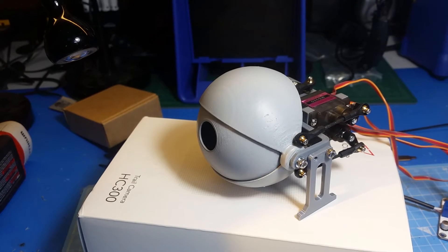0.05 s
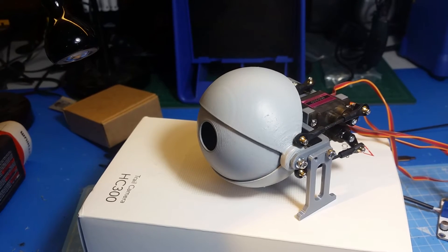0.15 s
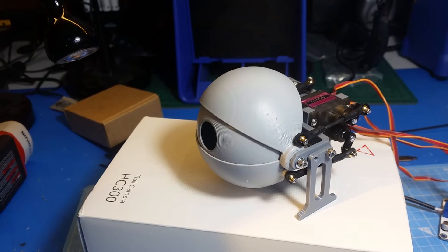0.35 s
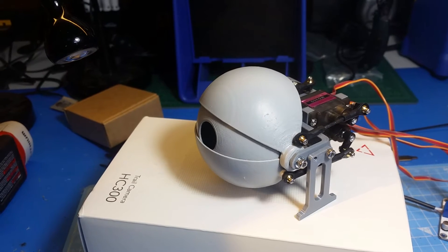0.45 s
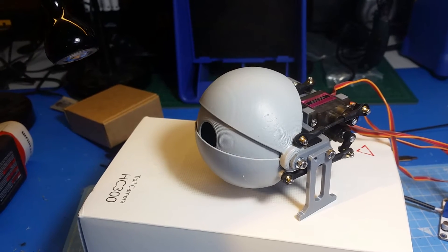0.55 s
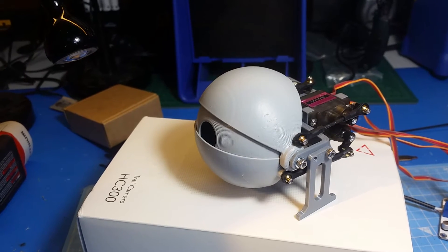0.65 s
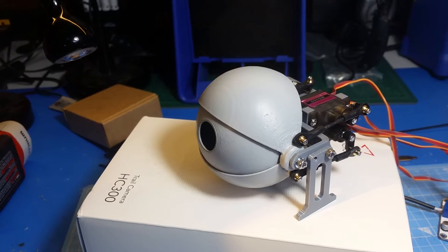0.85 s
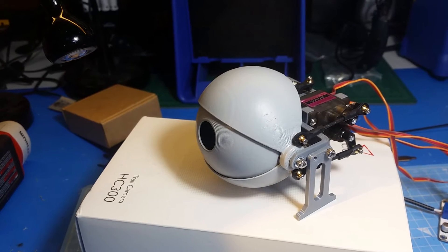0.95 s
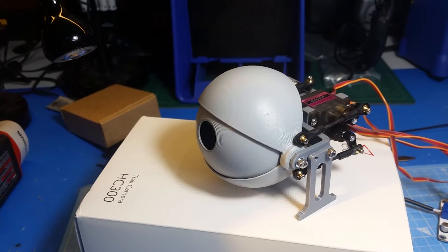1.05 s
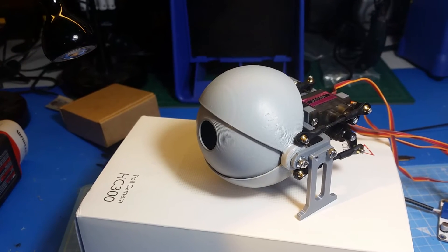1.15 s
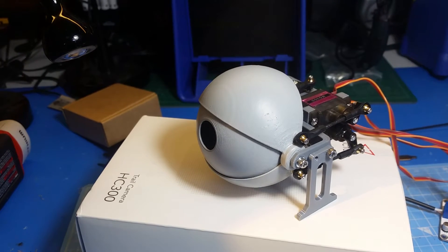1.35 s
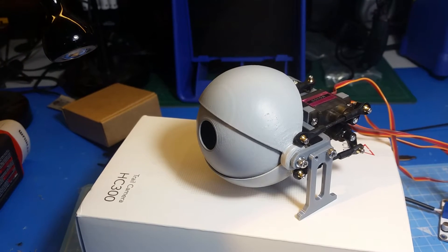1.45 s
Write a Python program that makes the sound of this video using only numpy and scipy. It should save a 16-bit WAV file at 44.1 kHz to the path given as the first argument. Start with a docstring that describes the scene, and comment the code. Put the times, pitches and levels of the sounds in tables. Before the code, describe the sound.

After a moment of faint hum and hiss, tiny plastic-geared motors buzz and chatter twice, pause, then twice more; soft knocks and taps follow, close to the microphone with light room echo.

```python
"""A low hum and faint hiss in a quiet workshop, then two pairs of short servo whirs, heard close.
The servos move a plastic mechanical eye on a cardboard box. Tooth contacts are clicks and chatter that
excite the servo cases; grinding and gliding whines sound through the plastic frame.
Levers knock softly, the box booms faintly and the lid settles with taps; bench and room add echoes."""
import sys
import numpy as np
from scipy import signal
from scipy.fft import rfft, irfft, next_fast_len
from scipy.io import wavfile
from scipy.ndimage import map_coordinates

SR = 44100
rng = np.random.default_rng(int(sys.argv[2]) if len(sys.argv) > 2 else 0)


def wav_out(sig):
    """Save sig, one row per channel (or a flat mono array), as 16-bit PCM at SR to the path in sys.argv[1]."""
    wavfile.write(sys.argv[1], SR, np.round(np.clip(np.atleast_2d(sig).T, -1, 1) * 32767).astype(np.int16))


N = 66150

# room noise spectrum shapes: (frequency [Hz], relative density [dB])
RUMBLE_SHAPE = [(12, -40), (20, -12), (42, -9), (65, -11), (101, -5), (145, -8), (167, -18), (204, -15),
                (282, -19), (318, -13), (507, -30), (2500, -45), (3250, -76), (5500, -120)]
HISS_SHAPE = [(1200, -12.5), (2500, -17), (3500, -12.5), (4500, 0), (5200, -11.5), (6300, -25.5),
              (9000, -31), (13000, -27.5), (16000, -23.5)]
# left-right correlation of the room noise: (frequency [Hz], correlation [0-1])
NOISE_CORRELATION = [(40, 1), (300, 0.31), (800, 0), (2000, 0), (10000, 0.091)]
# room hum: (frequency [Hz], mean level [dB])
HUM_TONES = [(97, -72), (199, -81), (317, -73)]
RUMBLE_DB, HISS_DB = -63.5, -73

# room decay: (frequency [Hz], t60 [s])
ROOM_T60 = [(150, 0.93), (1000, 0.8), (6000, 0.55), (15000, 0.72)]
# room response: (frequency [Hz], relative gain [dB])
ROOM_RESPONSE = [(1500, 8.5), (3700, 10), (6000, -7), (9000, -16.5), (13000, -7)]
WHIR_TO_ROOM_DB, BODY_TO_ROOM_DB, BENCH_DB, BENCH_T60_S = -11, -21, -8, 0.033

# box rocking under the moving eye: (start [s], length [s], level [dB])
BOX_ROCKING = [(0.305, 0.12, -56), (0.441, 0.12, -52.5), (0.618, 0.062, -55), (0.806, 0.092, -53),
               (0.9, 0.14, -56.5)]
BOX_HZ, BOX_SECOND_HZ, BOX_SECOND_DB = 89.37, 133, -10
BOX_WAVER_SHARE, BOX_UNEVEN_DB = 0.082, 2

# linkage knocks: (time [s], peak [dB], centre [Hz], time to fall 20 dB [s])
LINKAGE_KNOCKS = [(0.115, -49, 134, 0.0028), (0.933, -53, 1010, 0.054), (0.944, -48, 248, 0.12),
                  (1.027, -58, 765, 0.032)]
# lid taps against the frame: (time [s], peak [dB])
LID_TAPS = [(1.025, -58.5), (1.034, -51), (1.046, -59.5)]
TAP_FALL_20DB_S, TAP_NOISE_GAIN = 0.014, 0.053

# grinding in the frame: (time [s], level [dB])
GRIND_LEVEL = [(.17, -80), (.225, -58), (.262, -49.5), (.305, -63.5), (.36, -61), (.42, -59), (.47, -61.5),
               (.505, -60), (.59, -75.5), (.69, -76.5), (.745, -53), (.777, -49), (.83, -63), (.862, -51.5),
               (.91, -59), (.947, -56.5), (1.0, -78.5)]
# plastic frame and box response: (frequency [Hz], relative gain [dB])
FRAME_RESPONSE = [(60, -5), (200, -4), (330, -6), (500, -4), (620, -14), (800, -17), (1000, -9.5),
                  (1250, -16), (1650, -7), (1850, -14), (2020, -15), (2400, -23), (4000, -38)]
# frame resonances: (centre [Hz], width [Hz], relative gain [dB])
FRAME_RESONANCES = [(319, 10, 0), (478, 72, -0.5), (711.4, 22, -3), (986, 80, -15.5), (1577, 23, -24.5)]
# frame sound, left over right: (frequency [Hz], difference [dB])
FRAME_LEFT_OVER_RIGHT = [(300, 0), (550, -1), (800, 3), (1200, 7), (1700, 11), (2700, 7)]
# gear whines:
# (start [s], length [s], first pitch [Hz], last pitch [Hz], level before trim [dB], pitch jitter [share])
GEAR_WHINES = [(0.239, 0.039, 465, 531.5, -39.5, 0.0047), (0.222, 0.082, 1106, 1767, -54.5, 0.036),
               (0.232, 0.067, 698, 713, -59.5, .004), (0.272, 0.025, 394, 181, -47.5, 0.053),
               (0.348, 0.029, 1524, 1515, -52, 0.036), (0.354, 0.063, 1140, 1118, -62.5, 0.015),
               (0.487, 0.045, 1610, 1700, -54, .06), (0.735, 0.037, 318, 380.6, -49.5, 0.018),
               (0.739, 0.057, 1685, 1629, -51, .015), (.762, 0.027, 440.6, 546, -49.5, 0.031),
               (.766, .035, 1960, 1980, -54.5, 0.0095), (.768, 0.027, 954, 983.3, -54.5, .03),
               (.925, 0.052, 2013, 1992, -60, 0.018)]
FRAME_RING_DB, WHINE_TRIM_DB, WHINE_ROUGH_DB = -5, -3, 2.5

# gear mesh speed: (time [s], tooth rate [Hz])
MESH_SPEED = [(.2, 329.1), (.24, 479.2), (.266, 522.6), (.3, 240.6), (.36, 380), (.52, 418.5), (.57, 300),
              (.7, 250.2), (.78, 542.6), (.83, 297.6), (.86, 472), (1.0, 200.1)]
# gear drive, one list per pair of whirs:
# (time [s], rattle level before trim [dB], treble relative to it [dB])
GEAR_DRIVE = [
    [(0.165, -101, -16), (0.175, -64, -16.5), (0.227, -41, -2.5), (0.245, -42.5, 1), (0.257, -36.5, -1),
     (0.271, -44, 2.5), (0.291, -45, -6), (0.304, -56.5, -14.5), (0.316, -53, -8), (0.321, -43.5, -9.5),
     (0.353, -39.5, -6), (0.437, -41, -10), (0.475, -48.5, -9), (0.485, -41, -10), (0.521, -42, -7.5),
     (0.537, -56, -15), (0.555, -47.5, -14.5), (0.571, -71.5, -9), (0.6, -70.5, -8)],
    [(0.675, -93.5, -11), (0.683, -68, -20), (0.709, -49.5, -19.5), (0.757, -36.5, -4.5),
     (0.781, -37, -5.5), (0.809, -46.5, -9.5), (0.815, -44, -12), (0.829, -63.5, -7), (0.837, -46, -11.5),
     (0.846, -42, -8.5), (0.857, -35, -16), (0.877, -45, -10), (0.903, -39.5, -11.5), (0.971, -44.5, -16.5),
     (1.001, -65.5, -13), (1.02, -66, -8.5)],
]
# rattle spectrum shape on each side: (frequency [Hz], relative gain [dB])
LEFT_RATTLE = [(900, -59.5), (2700, -31.5), (3700, -17), (4900, -11), (5600, -4), (6100, -3.5), (6700, -7),
               (7500, -6), (8300, -12), (9300, -21), (11000, -23.5), (16000, -62.5)]
RIGHT_RATTLE = [(900, -57), (2700, -32.5), (3700, -41), (4600, -22.5), (5700, -21.5), (7400, -27.5),
                (8600, -22.5), (9500, -37), (11000, -18), (16000, -45)]
# fine tooth scrape: (frequency [Hz], relative gain [dB])
SCRAPE_SHAPE = [(4000, -38), (8000, -18), (9600, -11), (11000, -14), (12400, -4), (13200, -1), (14100, 0),
                (15100, -3), (15800, -6)]
# low and high servo case modes, then thin modes rung with the scrape:
# (centre [Hz], width [Hz], relative gain [dB])
LOW_CASE_MODES = [(4830, 120, -14), (5320, 60, -7), (5510, 50, -1), (5600, 50, -3), (5730, 45, -1),
                  (5825, 45, 0), (6005, 60, -2), (6110, 60, -6), (6250, 50, -5), (6400, 45, -4)]
HIGH_CASE_MODES = [(7220, 120, -6), (7370, 110, -5), (7540, 90, 0), (7740, 140, -7), (8560, 170, -13)]
THIN_MODES = [(12400, 90, -6), (13160, 50, 0), (13850, 90, -3), (14040, 60, 0), (14350, 110, -3),
              (14900, 60, -4), (15170, 70, -3)]
TOOTH_SCATTER_TEETH, TOOTH_SIZE_DB, CHATTER_PER_S, CHATTER_DB = .07, 2, 16000, 4.5
RATTLE_DB, LOW_RING_DB, HIGH_RING_DB = -0.5, -1, 3
SCRAPE_DB, SCRAPE_LEFT_DB, SCRAPE_RING_DB = 4, -1.45, -4.5
SHUDDER_DB, SHUDDER_PER_S = 0.5, 260
CASE_CUT_HZ, RIGHT_LEAD_S = 2310, .000243

TOP_HZ = 15900


def amp(db):
    """Decibels to gain."""
    return 10 ** (np.asarray(db) / 20)


def unit(x):
    """Scale to rms 1."""
    return x / np.sqrt(np.mean(x ** 2) + 1e-20)


def along(points, hz):
    """Interpolate (Hz, value) points on a log frequency axis."""
    f, v = np.transpose(points)
    return np.interp(np.log(hz + 1), np.log(f + 1), v)


def curves(rows):
    """One value per sample for each column after the time."""
    s, *cols = np.transpose(rows)
    return [np.interp(np.arange(N) / SR, s, c) for c in cols]


def running(rows):
    """True between the first and last time of a curve."""
    t = np.arange(N) / SR
    return (t > rows[0][0]) & (t < rows[-1][0])


def swell(start_s, length_s):
    """Progress through an event (0-1) and its arched envelope."""
    progress = np.clip((np.arange(N) / SR - start_s) / length_s, 0, 1)
    return progress, np.sin(np.pi * progress)


def wobble(knots_per_s):
    """Smooth random curve through normally distributed knots."""
    knots = rng.standard_normal(2048)
    return map_coordinates(knots, [np.arange(N) * knots_per_s / SR], mode="wrap")


def filtered(x, response):
    """Multiply the spectrum of x by a complex response of frequency."""
    m = next_fast_len(N + SR // 2)
    return irfft(rfft(x, m) * response(np.fft.rfftfreq(m, 1 / SR)), m)[..., :N]


def coloured(x, spectrum):
    """Shape x by (Hz, dB) points."""
    return filtered(x, lambda hz: amp(along(spectrum, hz)))


def ringing(x, modes):
    """Excite parallel second-order resonances of alternating sign; rms 1."""
    def response(hz):
        total = 0
        for k, (centre_hz, width_hz, db) in enumerate(modes):
            damping = 1j * hz * width_hz
            total = total + (-1) ** k * amp(db) * damping / (centre_hz ** 2 - hz ** 2 + damping)
        return total
    return unit(filtered(x, response))


def air(spectrum):
    """Steady stereo noise of rms 1; the mid-side balance sets the left-right correlation."""
    def mid_side(hz):
        angle = np.arccos(np.clip(along(NOISE_CORRELATION, hz), -1, 1)) / 2
        return amp(along(spectrum, hz)) * np.array([np.cos(angle), np.sin(angle)])
    mid, side = filtered(rng.standard_normal((2, N)), mid_side)
    return unit(np.array([mid + side, mid - side]))


def background():
    """Low rumble and faint hiss of shaped noise, with hum tones wavering in level and phase."""
    t = np.arange(N) / SR
    hum = np.zeros(N)
    for hz, db in HUM_TONES:
        level = amp(db + 2 * wobble(9))
        hum += level * np.sin(2 * np.pi * hz * t + .5 * wobble(9))
    return amp(RUMBLE_DB) * air(RUMBLE_SHAPE) + amp(HISS_DB) * air(HISS_SHAPE) + hum


def room(x):
    """Workshop tail: noise in which each frequency decays at its own rate."""
    hz, t, z = signal.stft(rng.standard_normal((2, SR)), SR, nperseg=256)
    decay = amp(-60 * t / along(ROOM_T60, hz)[:, None])
    tail = signal.istft(z * decay, SR, nperseg=256)[1]
    tail /= np.linalg.norm(tail[0])
    return signal.fftconvolve(coloured(x, ROOM_RESPONSE), tail, axes=1)[:, :N]


def bench(x):
    """Early echoes from things on the bench, as 50 ms of decaying noise."""
    t = np.arange(SR // 20) / SR
    echoes = rng.standard_normal((2, len(t))) * amp(-60 * t / BENCH_T60_S)
    return signal.fftconvolve(x, echoes / np.linalg.norm(echoes[0]), axes=1)[:, :N]


def box():
    """Rocking drives the cardboard box's two lowest resonances, as uneven, wavering sines."""
    drive = sum(amp(db) * swell(start_s, length_s)[1] for start_s, length_s, db in BOX_ROCKING)

    def boom(centre_hz):
        level = amp(BOX_UNEVEN_DB * wobble(40))
        hz = centre_hz * (1 + BOX_WAVER_SHARE * wobble(40))
        return level * np.sin(2 * np.pi * np.cumsum(hz) / SR)

    return drive * (boom(BOX_HZ) + amp(BOX_SECOND_DB) * boom(BOX_SECOND_HZ))


def linkage():
    """Levers take up their play: a push and a noisy shudder, band-passed to a dull knock."""
    out, t = np.zeros(N + SR), np.arange(SR // 4) / SR
    for time_s, db, centre_hz, fall_s in LINKAGE_KNOCKS:
        shudder = rng.standard_normal(len(t)) * amp(-20 * t / fall_s)
        push = np.exp(-t * centre_hz * 2 * np.pi)
        band_hz = [centre_hz / 1.7, centre_hz * 1.7]
        band = signal.butter(2, band_hz, "band", fs=SR, output="sos")
        knock = signal.sosfilt(band, shudder + push)
        out[round(time_s * SR):][:len(t)] += amp(db) * knock / np.abs(knock).max()
    return out[:N]


def eyelid():
    """The lid settles in quick taps: an impulse and decaying noise ring the frame."""
    out, t = np.zeros(2 * N), np.arange(N) / SR
    for time_s, db in LID_TAPS:
        noise = rng.standard_normal(N) * amp(-20 * t / TAP_FALL_20DB_S)
        contact = signal.unit_impulse(N) + TAP_NOISE_GAIN * noise
        ring = ringing(contact, FRAME_RESONANCES)
        out[round(time_s * SR):][:N] += amp(db) * ring / np.abs(ring).max()
    return out[:N]


def contacts(teeth_passed):
    """Scattered clicks, one per meshing tooth, plus random chatter of loose gears; rms 1."""
    tooth = np.arange(1024)
    scattered = tooth + TOOTH_SCATTER_TEETH * rng.standard_normal(len(tooth))
    at = np.interp(scattered, teeth_passed, np.arange(N), right=N)
    sizes = amp(TOOTH_SIZE_DB * rng.standard_normal(len(tooth)))
    clicks = np.bincount(at.astype(int), sizes, N + 1)[:N]
    chatter = (rng.random(N) < CHATTER_PER_S / SR) * rng.standard_normal(N)
    return unit(unit(clicks) + amp(CHATTER_DB) * unit(chatter))


def whines():
    """Short gear whines: arched, rough sines that glide in pitch."""
    out = np.zeros(N)
    for start_s, length_s, first_hz, last_hz, db, jitter in GEAR_WHINES:
        progress, arch = swell(start_s, length_s)
        hz = (first_hz + (last_hz - first_hz) * progress) * (1 + jitter * wobble(400))
        level = amp(db + WHINE_TRIM_DB + WHINE_ROUGH_DB * wobble(200))
        out += level * arch * np.sqrt(2) * np.sin(2 * np.pi * np.cumsum(hz) / SR)
    return out


def frame(teeth_passed):
    """Tooth grinding rings the plastic frame's resonances; whines share its stereo tilt."""
    level_db, = curves(GRIND_LEVEL)
    grind = unit(coloured(contacts(teeth_passed), FRAME_RESPONSE))
    grind = amp(level_db) * running(GRIND_LEVEL) * grind
    ring = amp(FRAME_RING_DB) * grind.std() * ringing(grind, FRAME_RESONANCES)
    halves = np.array([[.5], [-.5]])
    return filtered(grind + ring + whines(), lambda hz: amp(along(FRAME_LEFT_OVER_RIGHT, hz) * halves))


def gears(teeth_passed):
    """Tooth contacts rattle and ring the servo cases; the treble curve lifts high modes and scrape."""
    effort, bright = np.zeros(N), np.zeros(N)
    for move in GEAR_DRIVE:
        level_db, treble_db = curves(move)
        effort += amp(level_db) * running(move)
        bright += amp(level_db + treble_db) * running(move)
    teeth = contacts(teeth_passed)
    rattle = np.array([coloured(contacts(teeth_passed), side) for side in (LEFT_RATTLE, RIGHT_RATTLE)])
    pair = amp(RATTLE_DB) * effort * rattle / rattle[0].std()
    # case modes sound on the left only
    pair[0] += amp(LOW_RING_DB) * effort * ringing(teeth, LOW_CASE_MODES)
    pair[0] += amp(HIGH_RING_DB) * np.sqrt(effort * bright) * ringing(teeth, HIGH_CASE_MODES)
    scrape = unit(coloured(contacts(teeth_passed), SCRAPE_SHAPE))
    scrape = unit(scrape + amp(SCRAPE_RING_DB) * ringing(teeth, THIN_MODES))
    pair += amp(SCRAPE_DB + SCRAPE_LEFT_DB * np.array([[1], [-1]])) * bright * scrape
    pair *= amp(SHUDDER_DB * wobble(SHUDDER_PER_S))
    pair = signal.sosfilt(signal.butter(2, CASE_CUT_HZ, "high", fs=SR, output="sos"), pair)
    # half the lead delays the left, half advances the right
    shift_s = RIGHT_LEAD_S / 2 * np.array([[-1], [1]])
    return filtered(pair, lambda hz: np.exp(2j * np.pi * hz * shift_s))


def scene():
    """One mesh speed drives gears and frame; the bench echoes the whir, the room whir and body."""
    mesh_hz, = curves(MESH_SPEED)
    teeth_passed = np.cumsum(mesh_hz) / SR
    whir = gears(teeth_passed)
    body = frame(teeth_passed) + linkage() + eyelid()
    sent = amp(WHIR_TO_ROOM_DB) * whir + amp(BODY_TO_ROOM_DB) * body
    echoes = amp(BENCH_DB) * bench(whir) + room(sent + 0.39 * sent[::-1])  # 0.39: left-right crossfeed
    return whir + body + box() + echoes + background()


def record(dry):
    """Band limit: the treble falls steeply to nothing 150 Hz above TOP_HZ."""
    return filtered(dry, lambda hz: np.clip((TOP_HZ + 150 - hz) / 400, 0, 1) ** 2)


dry = scene()
out = record(dry)
wav_out(out)
```